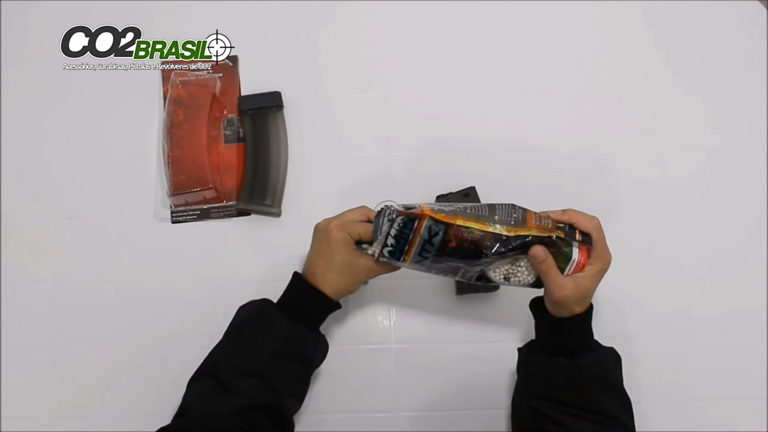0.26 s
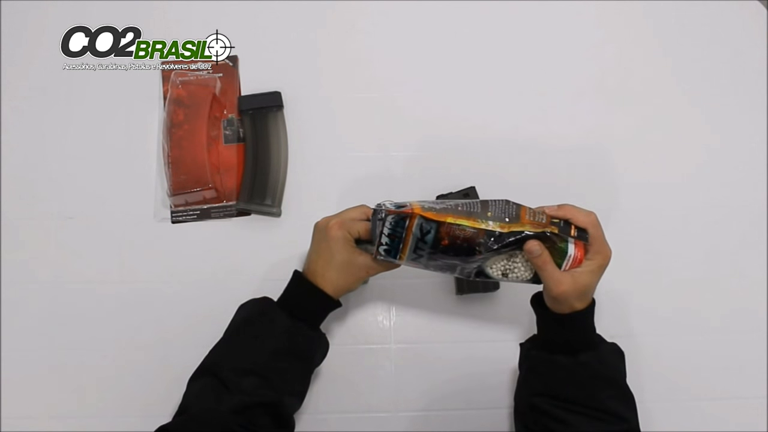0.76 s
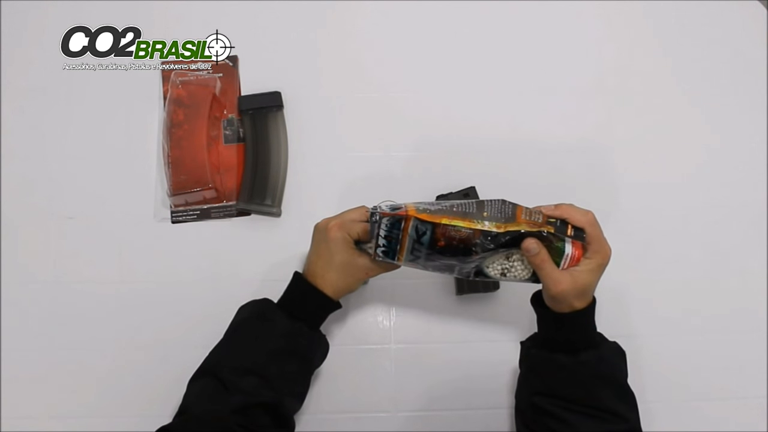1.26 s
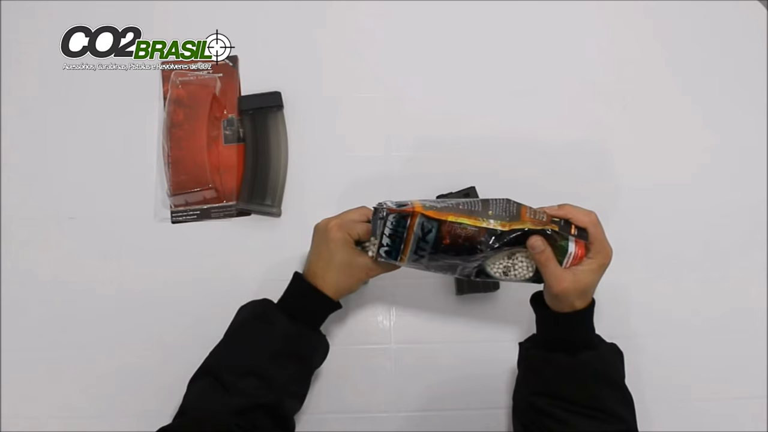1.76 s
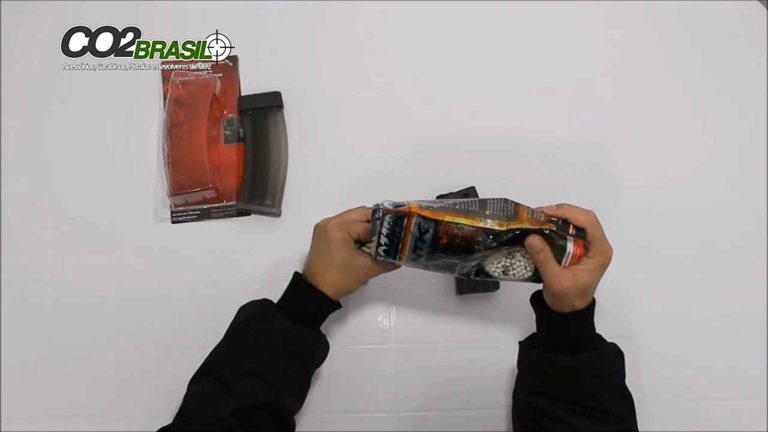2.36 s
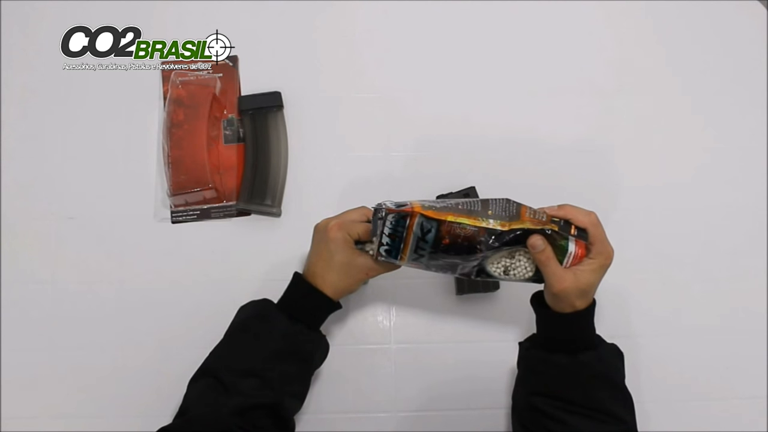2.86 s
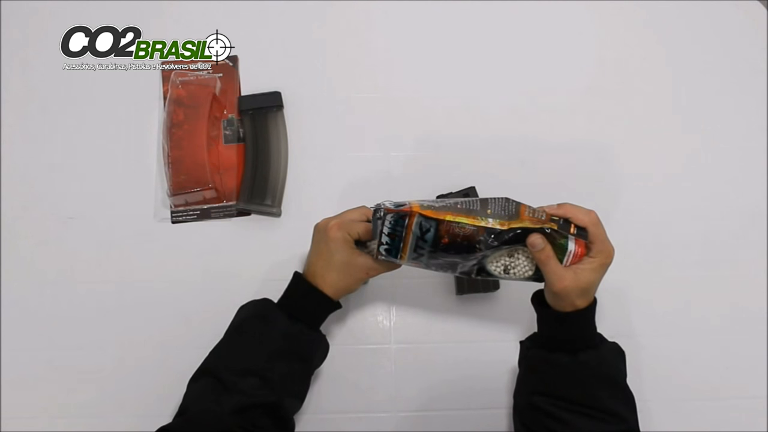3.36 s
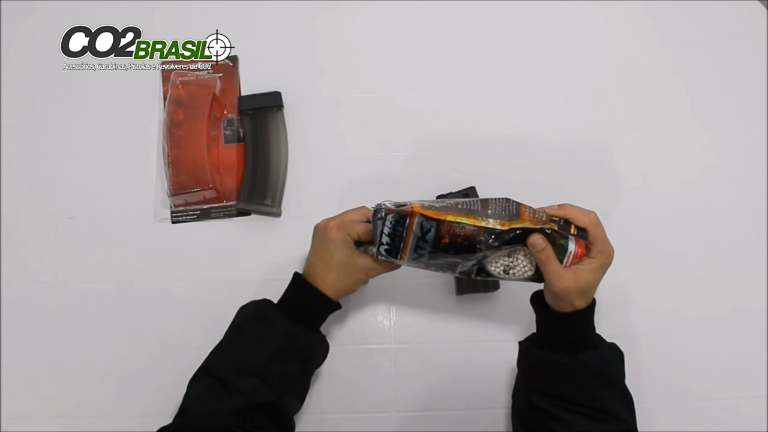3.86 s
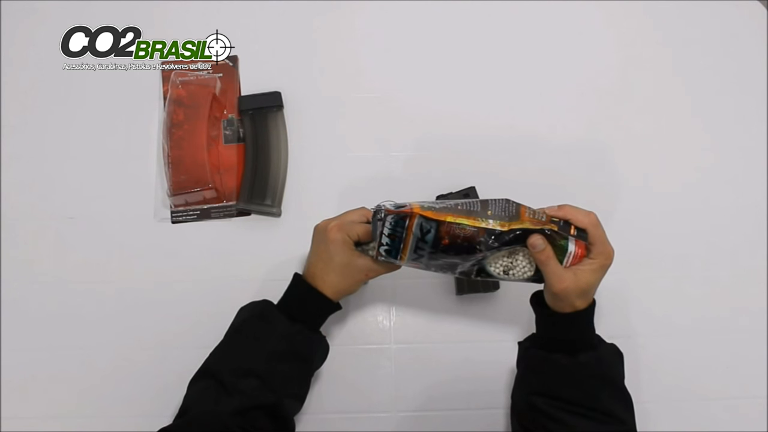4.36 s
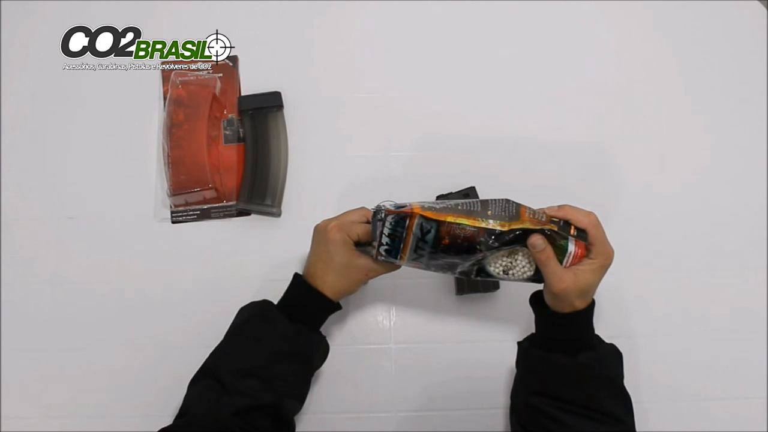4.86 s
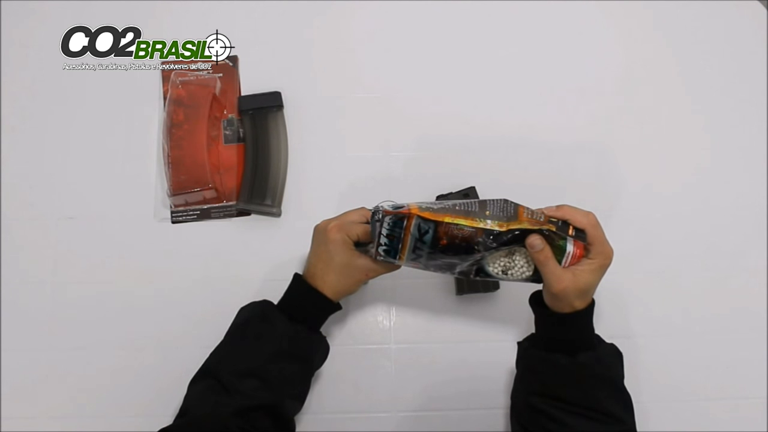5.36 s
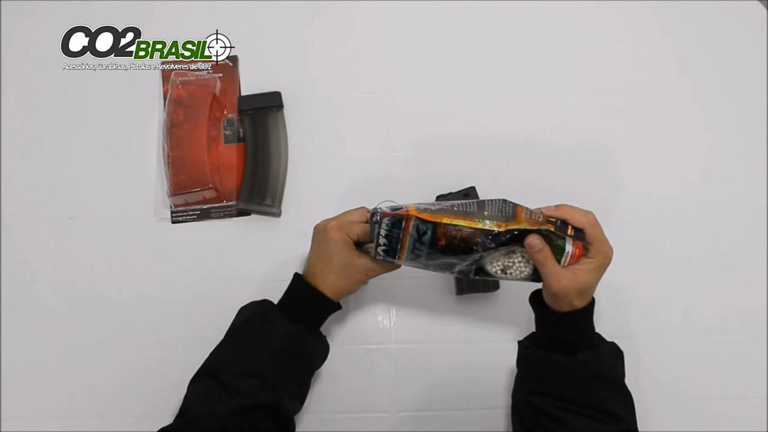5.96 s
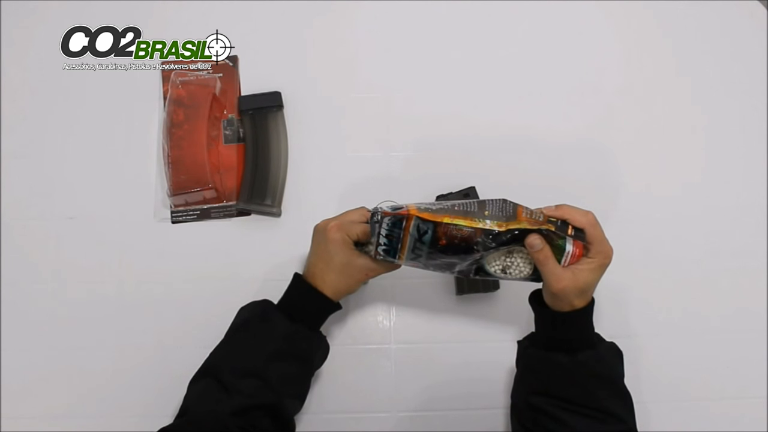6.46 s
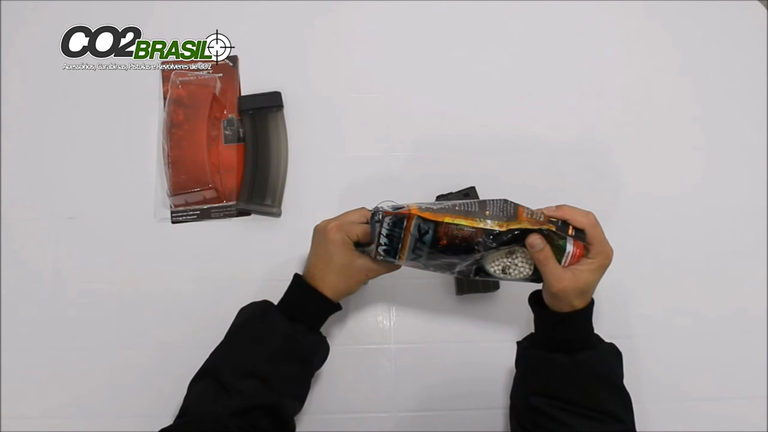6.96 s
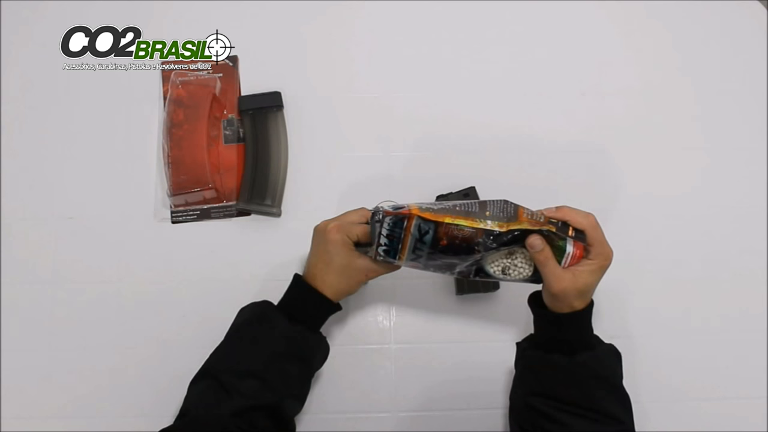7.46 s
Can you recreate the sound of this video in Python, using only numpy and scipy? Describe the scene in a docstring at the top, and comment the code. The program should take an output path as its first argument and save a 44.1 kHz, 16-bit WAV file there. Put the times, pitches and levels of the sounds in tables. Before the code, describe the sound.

Close indoor pour of small hard pellets into a plastic hopper: sharp clattering start, steady hissing rattle, then patchy thinning at the end.

```python
"""At a table indoors, a camera's microphone hears hard pellets stream from a foil bag into a plastic hopper.
Each pellet ticks and excites the hopper's resonances; bright wall modes give way to lower, duller ones as it fills.
Hard pellets snap and knock, others ping or hiss past each other, and an air cavity rings in patches.
Foil crackle and a low rumble, both shaped noise, start before the pour; near walls and a room tail answer the pellets.
The camera's gain control evens out the loud stream and limits the peaks."""
import sys
import numpy as np
from scipy import signal
from scipy.fft import rfft, irfft, next_fast_len
from scipy.io import wavfile
from scipy.ndimage import uniform_filter1d, minimum_filter1d, map_coordinates

SR = 44100
rng = np.random.default_rng(int(sys.argv[2]) if len(sys.argv) > 2 else 0)


def master(y):
    """Save y as 16-bit WAV."""
    cut = np.clip(np.atleast_2d(y).T, -1, 1)
    pcm = np.round(cut * 32767)  # scale
    wavfile.write(sys.argv[1], SR, pcm.astype(np.int16))


def magnitude_from_level(level_db):
    """Linear magnitude for a level in decibels (20 dB per decade)."""
    exponent = np.asarray(level_db, float) / 20
    return 10 ** exponent


N = 340011  # samples

# crackle of pellets shifting in the foil, before its wobble: start_s, level_db
BAG_LEVEL = [(0, -30.5), (.25, -30.5), (.45, -41.5), (3, -42.5), (7.7, -35)]
# colour of the foil: pitch_hz, density_db_per_hz (relative)
FOIL_COLOUR = [(120, -24), (157, -4.5), (195, -14), (300, -7.5), (750, -2.5), (1200, 3.5), (2100, -1),
               (4000, -4.5), (8000, -15.5), (15800, -28)]
# rumble of the building and the table, before its wobble: start_s, level_db
RUMBLE_LEVEL = [(0.0, -60), (0.17, -56), (0.73, -74), (1.14, -51), (1.33, -68.5), (2.6, -59), (2.62, -70),
                (3.56, -52), (3.73, -63), (4.12, -55), (5.47, -62), (5.75, -50), (5.84, -58.5),
                (7.71, -57.5)]
# colour of the rumble: pitch_hz, density_db_per_hz (relative)
RUMBLE_COLOUR = [(13, -44), (22, -25), (76, 11.5), (128, -1), (177, -27), (200, 9.5), (260, -36),
                 (440, -120)]

# the stream of pellets, before clogging and wobble: start_s, level_db
POUR = [(0.27, -25.5), (0.95, -27.5), (1.37, -25), (3.5, -25.5), (3.75, -25), (4.73, -27), (5.3, -27),
        (5.5, -25), (5.85, -26), (6.55, -27), (7.05, -26.5), (7.42, -29), (7.71, -31.5)]
# the bag's mouth clogs, then frees: free_s, depth_db, clog_s
CHOKES = [(0.3, 2, 0.041), (4.125, 5.5, 0.043), (4.84, 2.5, 0.064), (5.126, 7, 0.05), (5.298, 3, 0.091),
          (5.401, 4, 0.058), (5.484, 12.5, 0.046), (5.754, 10, 0.2), (5.805, 4.5, 0.056), (6.961, 3, 0.05),
          (7.2, 0.5, 0.155), (7.318, 12, 0.14), (7.404, 7.5, 0.071), (7.465, 6, 0.051), (7.555, 3.5, 0.067)]
FREE_S = 0.015  # the stream comes back this fast
# how full the hopper is: start_s, stage (0 empty to 3 full)
FILL = [(0, 0), (1.2, 0), (2.1, 0.67), (3.2, 1.5), (4.4, 1.56), (5.5, 2), (6.6, 2.5), (7.7, 3)]

# the loudest single pellets: start_s, snap_db, knock_db (nominal levels of the first hit)
STRIKES = [(0.2666, -6, -13), (0.3058, -4.5, -6), (0.339, -10, -10), (0.382, -7, -15), (0.416, -8, -12),
           (0.4257, -14, -11.5), (0.4398, -19, -16), (0.4489, -24, -19), (0.483, -13, -29),
           (0.533, -14, -18), (0.551, -17, -21), (0.625, -14, -14), (0.6625, -19, -21), (0.7052, -11, -21),
           (0.7262, -19, -16), (0.7474, -21, -20), (0.7607, -12, -18), (0.779, -18, -21), (0.799, -14, -14),
           (0.846, -10.5, -12), (0.8667, -26.5, -15), (0.8769, -12, -19), (0.8988, -21, -19),
           (0.9488, -13, -13), (0.971, -25, -27), (0.9901, -28, -21), (1.027, -13, -18), (1.0297, -4, -11),
           (1.1019, -10, -13.5), (1.1395, -10, -14), (1.1507, -14, -15), (1.2418, -12, -11.5),
           (1.2482, -6, -12), (1.2962, -12, -12), (1.3303, -10, -13), (1.4157, -14, -18),
           (1.5006, -24, -13.5), (1.5246, -22, -25), (1.558, -15, -13), (1.6034, -22, -20),
           (1.6507, -11, -16.5), (1.7376, -12, -16.5), (1.934, -13, -22), (2.0792, -13, -22),
           (2.2616, -14, -28), (2.4324, -17, -16), (2.4558, -16.5, -23), (2.5636, -17, -21),
           (2.6863, -19, -18), (2.7417, -17, -19), (2.8004, -15, -22), (2.8184, -9, -19),
           (3.1432, -14, -15), (3.2374, -12, -25), (3.2757, -15, -20), (3.3136, -17, -26),
           (3.3613, -13.5, -19), (3.4855, -13, -16), (3.7459, -15, -21), (3.7984, -15.5, -15),
           (3.903, -24, -20), (4.129, -13, -14), (4.172, -19.5, -17), (4.2035, -13, -17), (4.283, -20, -16),
           (4.344, -15, -20), (4.4405, -16, -14), (4.4794, -16.5, -23.5), (4.5267, -13.5, -21),
           (4.567, -12.5, -19), (4.599, -12, -15), (4.6178, -11, -18), (4.7532, -23, -17),
           (4.7738, -12.5, -16.5), (4.8299, -14, -22), (4.854, -16, -20), (4.877, -11.5, -20),
           (4.894, -16, -20), (4.9731, -17, -33), (5.037, -17.5, -24), (5.083, -15, -22),
           (5.1667, -14.5, -31), (5.3157, -13, -17), (5.3905, -18, -22), (5.408, -11.5, -20),
           (5.6528, -14, -18.5), (5.6865, -11.5, -25), (5.7605, -15, -23), (5.7725, -17, -27),
           (5.808, -9.5, -19), (5.8685, -14, -19), (5.952, -25, -16), (5.9908, -18, -19), (6.055, -12, -19),
           (6.097, -13, -18), (6.1783, -15, -20), (6.333, -10, -13), (6.5054, -18, -21),
           (6.5949, -14.5, -15), (6.688, -11, -12.5), (6.717, -14, -17), (6.764, -17, -17),
           (6.778, -15, -23), (6.7864, -11, -12), (6.9669, -15.5, -17), (7.1097, -14, -16),
           (7.2365, -18.5, -21), (7.3188, -20, -24), (7.3254, -18, -20), (7.352, -17, -20),
           (7.4143, -22, -14), (7.4372, -23, -25), (7.448, -23, -27), (7.4758, -21, -21),
           (7.5006, -16, -22), (7.5077, -16, -17), (7.566, -21, -20), (7.5848, -16, -19),
           (7.6117, -18, -25), (7.648, -19, -27), (7.676, -17, -19)]
# lesser hard pellets by chance: rate, middle levels over the stream, spread (up to twice this either way)
STRAYS_PER_S, STRAY_SNAP_DB, STRAY_KNOCK_DB, STRAY_SPREAD_DB = 30, 7, 6.5, 2
# colour of a direct, hard contact: pitch_hz, density_db_per_hz (relative)
SNAP_COLOUR = [(1500, -60), (3500, 5), (5000, 4), (7300, 2.5), (9500, -0.5), (11000, -8.5), (13000, -3.5),
               (15800, -13)]
# the wall under a hard pellet, before random spread: pitch_hz, level_db (relative), t60_s
KNOCK_MODES = [(1900, -2, .009), (2900, 0, .008), (3350, -1, .006), (4100, -6, .005)]
KNOCK_S = 0.0022  # before its level, a knock has the energy of a full-scale sine this long
SNAP_T60_S = 0.0071
# second hit of a hard pellet: delay, then middle levels of its knock and snap against the first
REBOUND_S, REBOUND_KNOCK_DB, REBOUND_SNAP_DB = 0.003, -2.5, -8.5
STRIKE_PUSH_DB = 6  # push into the hopper over a hard pellet's knock

# the hopper's resonances at four stages of filling, before random spread: pitch_hz, width_hz, level_db
MODES_EMPTY = [(266, 46, -22), (538, 30, -21.5), (1140, 23, -6.5), (1670, 67, -8.5), (1884, 27, -1),
               (2009, 65, 2), (2116, 69, -0.5), (2420, 470, -8.5), (2746, 39, -6), (2853, 43, 4),
               (2965, 93, 3), (3100, 82, 3.5), (3530, 380, -3.5), (4360, 530, -8)]
MODES_SHALLOW = [(227.7, 13, -11.5), (271, 15, -9), (331, 10, -11.5), (501, 13, 1), (1119, 35, -6),
                 (1232, 105, -2), (1910, 310, -16), (2204, 440, -3.5), (2750, 52, -14), (2850, 22, 1.5),
                 (3690, 600, -6), (4140, 680, -7.5), (4960, 700, -21)]
MODES_DEEP = [(268, 41, -13), (332.6, 18, -9), (458, 55, -2), (540, 35, -1), (916, 124, -7.5),
              (1190, 160, -8.5), (1762, 86, 0.5), (1883, 100, -3.5), (2025, 61, -1), (2268, 80, 4),
              (2723, 65, 4.5), (2800, 64, -2), (3410, 47, 6), (3800, 270, -2), (4260, 550, -5.5),
              (5000, 960, -11)]
MODES_FULL = [(344, 18, -4), (436, 39, -5), (540, 150, -3.5), (935, 150, 2), (1840, 370, -11),
              (2260, 380, 3), (2840, 240, -3), (3570, 140, -6), (4150, 750, -15)]
# tick of the contact on the bare wall: pitch_hz, density_db_per_hz (relative)
TICK_EMPTY = [(100, -51), (400, -43), (900, -27), (1600, -8), (3000, -17), (5000, -13.5), (8000, -12.5),
              (9600, -14.5), (11000, -22), (15800, -30)]
# tick of the contact on other pellets: pitch_hz, density_db_per_hz (relative)
TICK_FILLED = [(100, -44), (200, -43), (750, -14.5), (1500, -7.5), (3000, -9), (4800, -5.5), (6000, -6.5),
               (7500, -6), (10500, -16), (15800, -26)]
# bounces off hopper and table, before random spread: delay_s, level_db
BOUNCES = [(.0012, -6.5), (.0027, 0.5), (.0046, -4.5), (.007, -4.5)]

# pellets that ring one wall mode alone: pings per second of the whole scene, level over the stream, usual length
PINGS_PER_S, PING_DB, PING_S = 350, 3, 0.0018
# their usual pitch: start_s, pitch_hz
PING_PITCH = [(0, 2840), (1.6, 2870), (3, 2800), (7.7, 2820)]
# the air above the heap shrinks and its pitch shifts: start_s, pitch_hz, level_db (before wobble)
CAVITY = [(.3, 540, -52), (1.5, 540, -47.5), (2.6, 558, -35), (3.6, 598, -39), (4.5, 646, -34.5),
          (5.3, 618, -38.5), (6.3, 647, -40), (7.7, 630, -57)]
# pellets sliding over each other: pitch_hz, density_db_per_hz (relative)
SLIDE_COLOUR = [(700, -34), (2000, 8), (4000, 12), (6000, 8.5), (8500, -14.5), (11000, -27), (15800, -10)]
SLIDE_DB, SLIDE_FOLLOWS = -5, 0.6  # over the stream's mean dB; share of its swings

# near walls send back the duller part: delay_s, level_db (before colour)
ECHOES = [(.008, -10.5), (0.0155, -12.5), (0.0256, -14), (.0276, -12)]
# colour of those copies: pitch_hz, gain_db
ECHO_COLOUR = [(200, -2.5), (800, -1), (2000, -7.5), (5000, -12), (15800, -28)]
# decay of the room: pitch_hz, t60_s
ROOM_DECAY = [(200, 0.2), (2000, 0.48), (5000, 0.11), (10000, 0.064)]
PEAK, TOP_HZ = 0.54, 15830  # limiter ceiling ahead of the treble cut; top of the band


def unit(x):
    """x at rms 1."""
    return x / np.sqrt(np.mean(x ** 2) + 1e-20)


def along(points, hz):
    """(Hz, value) points on a log axis."""
    f, v = np.transpose(points)
    return np.interp(np.log(hz + 1), np.log(f + 1), v)


def curve(rows):
    """One value per sample of an (s, value) table."""
    return np.interp(np.arange(N) / SR, *np.transpose(rows))


def wobble(rate):
    """A smooth random curve, rate knots a second."""
    knots = rng.standard_normal(int(N * rate / SR) + 4)
    return map_coordinates(knots, [np.arange(N) * rate / SR])


def coloured(x, spectrum):
    """x with the colour of (Hz, dB) points, at rms 1."""
    size = next_fast_len(N + 8192)
    gain = magnitude_from_level(along(spectrum, np.fft.rfftfreq(size, 1 / SR)))
    return unit(irfft(rfft(x, size) * gain, size)[:N])


def contacts(rate, spread_db):
    """Random contacts, rate a second at each sample; a few are much harder than the rest."""
    when, hard = rng.random(N), rng.exponential(size=N)
    sign = rng.choice([-1, 1], N)
    return (when < rate / SR) * sign * magnitude_from_level(spread_db * np.minimum(hard, 4))


def lay(rows, at):
    """Adds up short sounds, one per row, at the given samples."""
    length = rows.shape[1]
    places = at[:, None] + np.arange(length)
    return np.bincount(places.ravel(), rows.ravel(), N + SR)[:N]


def bag():
    """Dense soft crackle of the foil: noise and random contacts, coloured."""
    crackle = rng.standard_normal(N) + 0.4 * contacts(600, spread_db=3)
    return magnitude_from_level(curve(BAG_LEVEL) + wobble(20)) * coloured(crackle, FOIL_COLOUR)


def rumble():
    """Low noise that comes and goes."""
    level_db = curve(RUMBLE_LEVEL) + 0.91 * wobble(4.2)
    return magnitude_from_level(level_db) * coloured(rng.standard_normal(N), RUMBLE_COLOUR)


def flow():
    """Level of the stream in dB: it thins while the mouth clogs and returns fast."""
    t = np.arange(N) / SR
    loss_db = sum(np.interp(t, [s - clog, s, s + FREE_S], [0, db, 0]) for s, db, clog in CHOKES)
    return curve(POUR) - loss_db


def strikes(flow_db):
    """The loudest pellets and a chance scatter of lesser ones: start_s, snap_db, knock_db."""
    start, end = POUR[0][0], POUR[-1][0] - FREE_S
    draw = rng.random((round(STRAYS_PER_S * (end - start)), 3))
    when = start + (end - start) * draw[:, 0]
    spread = STRAY_SPREAD_DB * 4 * (draw[:, 1:] - 0.5)
    level = flow_db[(when * SR).astype(int), None] + [STRAY_SNAP_DB, STRAY_KNOCK_DB] + spread
    return np.r_[STRIKES, np.c_[when, level]].T


def hard_pellets(at, snap_db, knock_db):
    """A sharp noise snap and a short knock of decaying wall modes, repeated by the rebound."""
    t = np.arange(900) / SR
    draw = rng.standard_normal((len(at), 2 * len(KNOCK_MODES) + 1))
    knock = np.zeros((len(at), len(t)))
    for k, (hz, db, t60) in enumerate(KNOCK_MODES):
        level_db = db + 2.15 * draw[:, [2 * k]] - 60 * t / t60
        pitch_hz = hz * (1 + 0.041 * draw[:, [2 * k + 1]])
        knock += magnitude_from_level(level_db) * np.sin(2 * np.pi * pitch_hz * t)
    knock *= 1 - np.exp(-t / 0.00036)  # soft onset
    knock /= np.linalg.norm(knock, axis=1)[:, None] / np.sqrt(KNOCK_S * SR / 2)

    snap = rng.standard_normal(knock.shape) * magnitude_from_level(-60 * t / SNAP_T60_S)
    snap *= 1 - np.exp(-(t / 0.0009) ** 2)
    snap /= np.linalg.norm(snap, axis=1)[:, None] / 4

    def twice(rows, rebound_db):
        """The first hit and its rebound."""
        second = rows * magnitude_from_level(rebound_db + 2 * draw[:, [-1]])
        return lay(rows, at) + lay(second, at + round(REBOUND_S * SR))

    snaps = twice(snap * magnitude_from_level(snap_db)[:, None], REBOUND_SNAP_DB)
    knocks = twice(knock * magnitude_from_level(knock_db)[:, None], REBOUND_KNOCK_DB)
    return knocks + coloured(snaps, SNAP_COLOUR) * np.std(snaps)


def blow(modes, tick, ring_db, rattle_s, attack_s, size=4096):
    """One spot's response, energy 1: a rattling tick and detuned modes at new strengths, with short bounces."""
    f, t = np.fft.rfftfreq(size, 1 / SR), np.arange(size) / SR
    # folding the cepstrum gives the tick minimum phase, so its energy comes early
    cep = irfft(np.log(magnitude_from_level(along(tick, f)) + 1e-6))
    cep = np.r_[cep[0], 2 * cep[1:size // 2], np.zeros(size // 2)]
    rattle = rng.standard_normal(size) * magnitude_from_level(-60 * t / rattle_s) * (1 - np.exp(-t / attack_s))
    rattle /= np.linalg.norm(rattle)
    click = magnitude_from_level(rng.normal(0, 2.7)) * np.exp(rfft(cep)) * rfft(rattle)

    def resonance(hz, width):
        return 1j * f * width / (hz * hz - f * f + 1j * f * width)

    ring = 0
    for hz, width, db in modes:
        hz = hz * rng.normal(1, 0.0072)
        strength = magnitude_from_level(db + ring_db + rng.normal(0, 4.3)) * rng.choice([-1, 1])
        ring = ring + strength * resonance(hz, width) * resonance(hz, 1 / attack_s)  # the second softens the onset
    bounce = 1
    for s, db in BOUNCES:
        delay = np.exp(-2j * np.pi * f * s * rng.uniform(0.8, 1.2))
        bounce = bounce + magnitude_from_level(db) * rng.choice([-1, 1]) * delay
    response = irfft((click + ring) * bounce)
    return response / np.linalg.norm(response)


def hopper(hits, count):
    """Each hit lands on one of count spots and sounds with the two nearest stages of filling."""
    fill, spot, out = curve(FILL), rng.integers(count, size=N), np.zeros(N)
    stages = [(MODES_EMPTY, TICK_EMPTY), (MODES_SHALLOW, TICK_FILLED),
              (MODES_DEEP, TICK_FILLED), (MODES_FULL, TICK_FILLED)]
    for k, (modes, tick) in enumerate(stages):
        share = np.sqrt(np.clip(1 - abs(fill - k), 0, 1))
        for j in range(count):
            response = blow(modes, tick, ring_db=0.86, rattle_s=0.0028, attack_s=0.00078)
            out += signal.oaconvolve(hits * share * (spot == j), response)[:N]
    return out


def burst(at, hz, length_s, db):
    """Soft-edged bursts of one pitch each, at the given samples."""
    t = np.arange(300) / SR
    life = t / np.clip(length_s, 0.0005, 0.006)[:, None]
    edge = np.sin(np.pi * np.minimum(life, 1)) ** 2
    return lay(magnitude_from_level(db)[:, None] * edge * np.sin(2 * np.pi * hz[:, None] * t), at)


def pings(flow_db):
    """Pellets ringing a single wall mode: pings scattered by chance in time, pitch and size."""
    draw = rng.standard_normal((round(PINGS_PER_S * N / SR), 3))
    at = rng.integers(round(POUR[0][0] * SR), N, len(draw))
    pitch_hz = curve(PING_PITCH)[at] * np.exp(0.084 * draw[:, 0])
    length_s = PING_S * np.exp(0.3 * draw[:, 1])
    level_db = flow_db[at] + PING_DB + 2.4 * draw[:, 2] - 1.3 * curve(FILL)[at]  # weaker as the hopper fills
    return burst(at, pitch_hz, length_s, level_db)


def cavity(hits, width_hz):
    """The hits ring one air resonance whose pitch shifts along the pour; it comes in patches."""
    s, hz, db = np.transpose(CAVITY)
    t = np.arange(N) / SR
    turn = np.exp(2j * np.pi * np.cumsum(np.interp(t, s, hz)) / SR)
    decay = np.exp(-np.pi * width_hz / SR)
    ring = (signal.lfilter([1], [1, -decay], hits / turn) * turn).real
    steady = ring / np.sqrt(abs(uniform_filter1d(ring ** 2, SR // 3)) + 1e-9)
    return magnitude_from_level(np.interp(t, s, db) + 1.9 * wobble(18)) * steady * (t > POUR[0][0])


def slide(flow_db):
    """Fine dense hiss of pellets rubbing on their way out of the bag."""
    grains = rng.standard_normal(N) + 0.5 * contacts(1500, spread_db=2)
    mean_db = flow_db.mean()
    level_db = mean_db + SLIDE_DB + SLIDE_FOLLOWS * (flow_db - mean_db) + wobble(29)
    return magnitude_from_level(level_db) * coloured(grains, SLIDE_COLOUR) * (np.arange(N) > POUR[0][0] * SR)


def pellets():
    """The stream comes in clumps, denser as the heap grows, sparser when it weakens; hard pellets stand out."""
    flow_db = flow()
    density_db = 0.6 * (flow_db - flow_db.max()) + 2.5 * curve(FILL) + 0.8 * wobble(40)
    rate = 1000 * magnitude_from_level(density_db)  # contacts a second
    stream = contacts(rate, spread_db=2.5)
    stream /= np.sqrt(uniform_filter1d(rate, 3000) / SR)  # keeps density from setting the level
    stream *= magnitude_from_level(flow_db + 0.78 * wobble(13)) * (np.arange(N) > POUR[0][0] * SR)
    start_s, snap_db, knock_db = strikes(flow_db)
    at = np.round(start_s * SR).astype(int)
    stream[at] += magnitude_from_level(knock_db + STRIKE_PUSH_DB)
    hard = hard_pellets(at, snap_db, knock_db)
    return hard + hopper(stream, count=24) + pings(flow_db) + cavity(stream, width_hz=44) + slide(flow_db)


def walls(x):
    """A few fixed, dull, inverted copies, as near walls send them back."""
    size = next_fast_len(N + 8192)
    hz = np.fft.rfftfreq(size, 1 / SR)
    copies = sum(-magnitude_from_level(db) * np.exp(-2j * np.pi * hz * s) for s, db in ECHOES)
    return irfft(rfft(x, size) * copies * magnitude_from_level(along(ECHO_COLOUR, hz)), size)[:N]


def room(x):
    """Each frequency of the room's answer dies at its own speed; every stretch of .15 s meets a new tail."""
    out, step = np.zeros(N + 4 * SR), round(0.15 * SR)
    delay = 350  # samples, 8 ms
    for a in range(0, N, step):
        hz, t, z = signal.stft(rng.standard_normal(SR // 2), SR, nperseg=256)
        decay = magnitude_from_level(-60 * t / along(ROOM_DECAY, hz)[:, None])
        tail = signal.istft(z * decay, SR, nperseg=256)[1]
        wet = signal.fftconvolve(x[a:a + step], tail / np.linalg.norm(tail))
        out[a + delay:a + delay + len(wet)] += wet
    return out[:N]


def scene():
    """The bag and the rumble, and the pellets with their walls and room."""
    near = pellets()
    return (bag() + rumble() + near + walls(near) + magnitude_from_level(-10.0) * room(near))[None]


def roll_off(x):
    """The treble ends steeply here."""
    return signal.sosfilt(signal.butter(12, 16510, fs=SR, output="sos"), x)


def record(dry):
    """The camera's gain control evens out the loud stream; it limits the peaks and cuts the top."""
    level = np.sqrt(abs(uniform_filter1d(dry ** 2, 5000)))
    gain = np.minimum(1, magnitude_from_level(-20.0) / (level + 1e-9)) ** 0.51  # roughly halves the dB above -20 dB
    even = dry * uniform_filter1d(gain, 2000)
    need = minimum_filter1d(np.minimum(1, PEAK / (abs(even) + 1e-9)), size=66)
    limited = even * uniform_filter1d(need, size=33)
    mix = irfft(rfft(limited) * (np.fft.rfftfreq(N, 1 / SR) < TOP_HZ), N)
    return roll_off(mix)


dry = scene()
out = record(dry)
master(out)
```